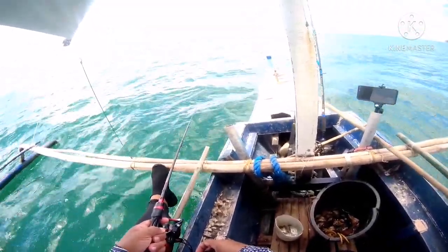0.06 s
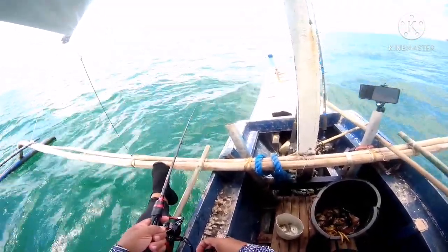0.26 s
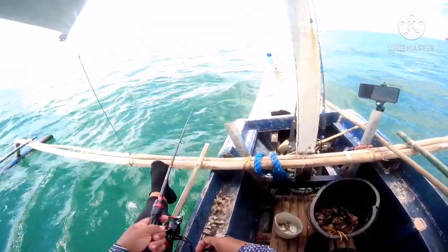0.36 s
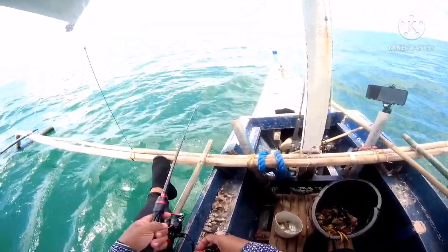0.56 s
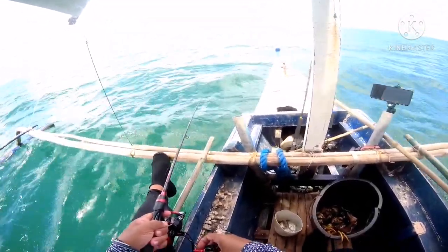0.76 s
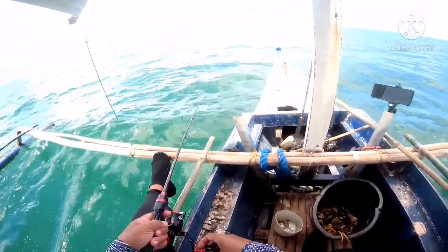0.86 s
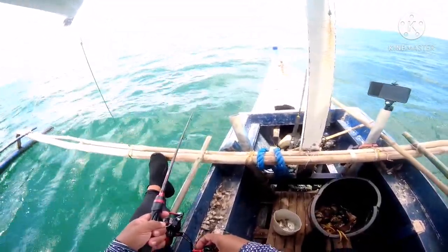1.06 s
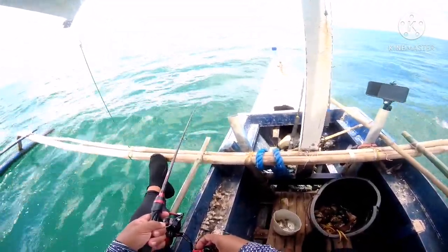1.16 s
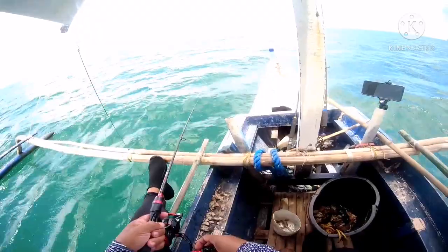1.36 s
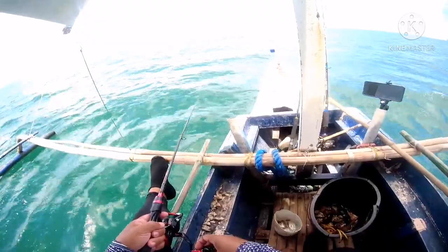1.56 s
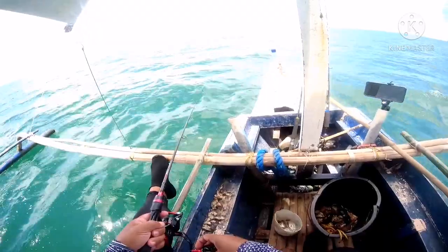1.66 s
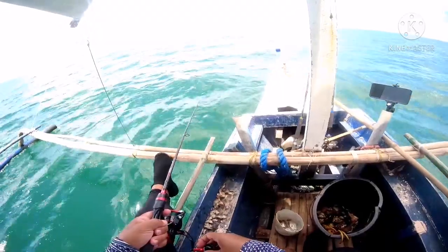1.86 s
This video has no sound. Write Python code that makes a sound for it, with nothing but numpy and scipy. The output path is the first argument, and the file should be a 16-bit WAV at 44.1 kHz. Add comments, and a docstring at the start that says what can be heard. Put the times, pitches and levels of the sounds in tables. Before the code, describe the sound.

Sea water sloshes against a small wooden boat, heard close from on board: hollow gulps and a slap early, sharp drips, then a heavier double slosh near the middle, fading to sparse trickles and drips.

```python
"""Water sloshes and gurgles under the hull of a small outrigger boat on a choppy sea, heard from on board.
Trapped pockets of air gulp as swelling tones, wavelets ring the hollow beside the hull, and heavy waves thud.
Two waves slap the side: short bursts of bubbles of many sizes. Spray patters and fizzes as crowds of bubbles.
Single drops tick close by, mostly on the right, each with a crack, a tiny ring and a splatter."""
import sys
import numpy as np
from scipy import signal
from scipy.fft import rfft, irfft
from scipy.io import wavfile

SR = 44100
rng = np.random.default_rng(int(sys.argv[2]) if len(sys.argv) > 2 else 0)


def store_wav(level_fs):
    """Save 16-bit WAV to argv[1]."""
    pcm = np.round(np.clip(np.atleast_2d(level_fs), -1, 1) * 32767)
    wavfile.write(sys.argv[1], SR, pcm.T.astype(np.int16))


N = 83790
T = np.arange(N) / SR   # time from the start, in seconds

# Levels in these tables are relative; some sounds get an overall gain in their own function.
# How much the side signal falls below the middle: f/Hz, level/dB
SIDE_LEVEL = [(100, -21.5), (600, -29), (1000, -18.5), (1500, -15), (2200, -9.5), (3200, -5.5),
              (5000, -4.5), (9000, -1)]
BOAT_DB, BOAT_T60_S = -10.5, 0.13   # reflections: level, time to fall 60 dB

# Heavy waves shove the air at the microphone: t/s, level/dB, decay time/s
SURGES = [(0.317, -26.5, 0.04), (0.831, -27, 0.02), (0.949, -15.5, 0.069)]
SURGE_RISE_S = 0.0012

# How hard the water works in each size of bubble, largest first: t/s, level/dB
HEAVE_LEVEL = [(0, -42), (.11, -57), (.15, -34.5), (.23, -51), (.29, -36), (.36, -49), (.405, -30),
               (.47, -54), (.51, -35.5), (.57, -52), (.66, -42), (.77, -40), (.835, -30), (.89, -40),
               (.945, -29.5), (1.04, -66), (1.45, -79), (1.5, -48.5), (1.54, -68), (1.9, -62.5)]   # deepest slosh under the hull
SLOSH_LEVEL = [(0, -33.5), (.115, -43.5), (.14, -32.5), (.2, -36), (.27, -18.5), (.35, -29.5), (.41, -22),
               (.48, -37.5), (.52, -30), (.57, -41), (.64, -30.5), (.76, -39), (.84, -16), (.89, -32.5),
               (.94, -25.5), (.995, -28), (1.04, -64), (1.27, -53.5), (1.37, -34), (1.46, -45),
               (1.58, -46.5), (1.88, -42)]
GURGLE_LEVEL = [(0, -40), (.17, -46), (.25, -51), (.28, -23), (.32, -33.5), (.40, -33), (.48, -46.5),
                (.79, -43.5), (.89, -35.5), (.94, -20), (1.02, -29.5), (1.11, -41.5), (1.21, -46),
                (1.27, -42.5), (1.42, -37.5), (1.52, -48), (1.6, -40), (1.71, -49.5), (1.9, -48.5)]
PATTER_LEVEL = [(0, -52.5), (.045, -41.5), (.125, -58), (.2, -44.5), (.3, -33), (.335, -38.5), (.45, -49),
                (.51, -36), (.56, -44), (.67, -34.5), (.71, -43), (.74, -34), (.8, -46), (.83, -36.5),
                (.9, -41.5), (.97, -29), (1.06, -33), (1.2, -35), (1.26, -48), (1.52, -51.5), (1.71, -55.5),
                (1.9, -44)]
FIZZ_LEVEL = [(0, -48), (.12, -51.5), (.25, -45), (.29, -41.5), (.34, -46), (.47, -48.5), (.52, -38),
              (.56, -45.5), (.6, -38.5), (.7, -43.5), (.75, -40.5), (.8, -43.5), (.87, -42), (.93, -37),
              (.99, -33.5), (1.06, -37), (1.16, -42.5), (1.23, -47.5), (1.33, -54), (1.45, -48.5),
              (1.7, -50), (1.9, -47.5)]
# Tone colour of each size: f/Hz, level/dB per bubble pitch
HEAVE_COLOUR = [(55, -16), (95, -17.5), (150, 3)]
SLOSH_COLOUR = [(185, -1), (230, 0), (290, -3), (360, -1), (450, -11.5)]
GURGLE_COLOUR = [(610, 1), (680, -0.97), (900, -5.1), (1450, 0.27)]
PATTER_COLOUR = [(1450, 1.2), (2000, 2.7), (3000, -0.5), (4800, -2)]
FIZZ_COLOUR = [(4800, 3), (7000, -0.5), (10000, -0.5), (13000, -4.5), (15500, -4)]
BUBBLE_ONSET_CYCLES = 3.47   # length of the push that sets a bubble ringing
SPRAY_PER_S = 1100   # falling spray is a dense crowd of small bubbles

# Wavelets lap into the hollow: t/s, pitch f/Hz, peak level/dB, swell time/s, loss one octave from pitch/dB
LAPS = [(.182, 600, -21, 0.031, 4), (1.015, 970, -24, 0.013, 44), (1.187, 1210, -32, 0.013, 7),
        (1.275, 1400, -38.5, 0.0081, 22), (1.304, 365, -36.5, 0.018, 17), (1.377, 510, -24.5, 0.0048, 8.5),
        (1.419, 520, -25.5, 0.0052, 5), (1.579, 1040, -30.5, 0.011, 30), (1.622, 1070, -30, 0.0075, 45)]
# Resonances of the hollow between hull and water: f/Hz, level/dB
HOLLOW = [(345, -0.5), (668, -0.5), (880, -2.5), (1210, -7), (1400, -12), (1700, -5)]
HOLLOW_WIDTH_HZ = 68   # bandwidth of each resonator; the sound passes through it twice

# Drops land near by: t/s, pitch f/Hz, level/dB, left minus right level/dB, cycles to the peak of the ring
DROPS = [(0.025, 5200, -32, -4, 3.8), (0.152, 3430, -17, 0.5, 1.6), (0.583, 8470, -19, -7, 1.2),
         (0.6078, 7400, -17, -10, 0.38), (0.644, 6360, -23.5, -4, 4.1), (0.665, 4760, -21, -17, 0.45),
         (.679, 11300, -16, -8, 0.42), (.7279, 4550, -6, -4, 0.86), (0.8569, 7000, -13.5, -9.5, 1.03),
         (1.1502, 8840, -11, -9, 0.5), (1.1805, 4170, -21, -1, 1), (1.3914, 7850, -14.5, -6, 0.46),
         (1.428, 8100, -26.5, 4, 0.79), (1.5508, 8760, -20.5, -8, 2), (1.731, 3700, -25.5, -3, 1.6)]
DROP_CRACK, DROP_CRACK_S = 0.41, 0.00044   # strength relative to the ring, decay time
SPLATTER_DB, SPLATTER_S = -20, 0.012   # level relative to the ring, decay time
DROP_LAG_S = .00002   # a drop reaches the left side later

# Waves slap the hull: t/s, level/dB, decay time/s
SLAPS = [(0.2652, -15.5, 0.013), (0.9658, -15, 0.019)]
# Tone colour of a slap: f/Hz, level/dB per bubble pitch
SLAP_COLOUR = [(150, -17), (330, 8), (650, 12.5), (1300, 4.5), (2500, 10), (4500, 0.5), (10000, -1),
               (15500, -6)]
SLAP_ATTACK_S = 0.001

# Large air pockets close by: t/s, pitch f/Hz, level/dB, ring length/cycles
GULPS = [(0.133, 251, -23.5, 3.4), (1.872, 249, -33, 7.4), (0.2394, 910, -11.5, 6.6), (.267, 339, -16, 6.9),
         (0.313, 155, -14.5, 1.3), (0.38, 178, -18, 1.5), (.390, 348, -21.5, 9.1), (0.404, 200, -21, 4.9),
         (0.5, 157, -29, 1.2), (0.631, 1090, -31.5, 15.7), (0.732, 1050, -33, 30), (.782, 444, -23, 26),
         (0.8267, 189, -5.5, 1.75), (.828, 530, -21.5, 4.9), (.842, 266, -13.5, 3.3), (0.94, 448, -4, 3.1),
         (0.942, 151, -18, 2.3), (1.154, 1350, -27.5, 28), (1.177, 951, -24.5, 8.1), (1.286, 1430, -33, 22),
         (1.316, 1180, -31.5, 18), (1.385, 1736, -36.5, 38), (1.858, 2700, -37, 14), (1.49, 260, -28, 5.3),
         (1.574, 1060, -24.5, 13.4), (.472, 1810, -26, 18), (.668, 2010, -25.5, 14),
         (1.129, 1760, -26.5, 9), (1.821, 1532, -25.5, 11.5), (1.881, 1397, -29.5, 34)]
GULP_SWELL, GULP_RISE = 0.24, 0.015   # share of a ring length spent swelling, pitch rise per ring length
GULP_DB = -2.5   # overall level
# Smaller bubbles shed by a pocket: level, swell time relative to the pocket's own, ring length
CHURN_DB, CHURN_LASTS, CHURN_CYCLES = -22, 4.55, 14.6

CUTOFF_HZ = 16000


def from_db(db):
    """Turn decibels into a plain multiplier."""
    return 10 ** (np.asarray(db) / 20)


def rms_one(x):
    """Scale a sound to an average strength (rms) of 1."""
    return x / np.sqrt(np.mean(x ** 2) + 1e-20)


def level(rows):
    """Gain over time, drawn as straight lines in dB between the rows."""
    times, dbs = np.transpose(rows)
    return from_db(np.interp(T, times, dbs))


def at_hz(points, hz):
    """Gain at a frequency, read between the points on a musical (log) scale."""
    pitches, dbs = np.transpose(points)
    return from_db(np.interp(np.log(hz), np.log(pitches), dbs))


def panned(db):
    """Left and right gains for a left minus right level difference."""
    return from_db(np.array([[.5], [-.5]]) * db)


def add(out, s, sound):
    """Mix a sound in from time s."""
    start = int(s * SR)
    out[:, start:] += sound[..., :N - start]


def stereo(mid, side, wide_db=0):
    """Left and right share the middle; the side sets them apart, little in the bass and more in the treble."""
    n = len(side)
    hz = (np.arange(n // 2 + 1) + .5) * SR / n
    side = irfft(rfft(side) * at_hz(SIDE_LEVEL, hz), n) * from_db(wide_db)
    return np.array([mid + side, mid - side])


def ring(x, hz, cycles):
    """A resonance that falls 60 dB in so many cycles, scaled for equal energy at any pitch."""
    hz = min(hz, .45 * SR)
    decay = from_db(-60 * hz / (cycles * SR))   # shrinkage per sample
    turn = 2 * np.pi * hz / SR   # phase step per sample
    feed = np.sqrt(1 - decay * decay) * np.array([1, 0, -1])
    feedback = [1, -2 * decay * np.cos(turn), decay * decay]
    return signal.lfilter(feed, feedback, x + 1e-18)


def bubbles(colour, per_s, cycles, spread_db, wash, wide_db=0, count=24):
    """A stereo cloud of random bubbles that swell and ring out, over a wash of countless far ones; rms 1."""
    low, high = colour[0][0], colour[-1][0]
    out = np.zeros((2, N))   # middle and side
    for hz in np.geomspace(low, high, count):
        born = rng.random(N) < per_s / count / SR
        size_db = spread_db * (np.minimum(rng.exponential(1, N), 4) - 2)
        sizes = from_db(size_db) * rng.choice([-1, 1], N)
        far, far_side, place = rng.standard_normal((3, N))
        # rarer bubbles are made stronger, to balance them with the wash
        near = born * sizes * np.sqrt(count * SR / per_s)
        source = np.array([near + wash * far, near * place + wash * far_side])
        push = np.sqrt(hz) * ring(source, hz, BUBBLE_ONSET_CYCLES)
        out += at_hz(colour, hz) * ring(push, hz, cycles)
    edges = [low * .85, min(high * 1.15, .45 * SR)]
    band = signal.butter(2, edges, "band", fs=SR, output="sos")
    mid, side = signal.sosfilt(band, out)
    return rms_one(stereo(mid, side, wide_db))


def boat(x):
    """A brief scatter of reflections from hull and deck: fading noise that smears the sound."""
    t = T[:SR // 4]
    mid, side = rng.standard_normal((2, len(t))) * from_db(-60 * t / BOAT_T60_S)
    echoes = stereo(mid, side) / np.sqrt(np.sum(mid ** 2))
    return from_db(BOAT_DB) * signal.fftconvolve(x, echoes, axes=1)[:, :N]


def surges():
    """A quick rise of air pressure that leaks away: a soft thud."""
    out = 0
    for s, db, decay_s in SURGES:
        t = np.maximum(T - s, 0)
        rise = 1 - np.exp(-(t / SURGE_RISE_S) ** 2)
        out = out + from_db(db) * rise * np.exp(-t / decay_s)
    return out


def water():
    """Five sizes of bubble, from the low heave under the hull to the high fizz of foam."""
    heave = bubbles(HEAVE_COLOUR, per_s=130, cycles=5.4, spread_db=3.5, wash=0.17, count=8)
    slosh = bubbles(SLOSH_COLOUR, per_s=400, cycles=12.2, spread_db=0.0, wash=0.36, count=14)
    gurgle = bubbles(GURGLE_COLOUR, per_s=900, cycles=14.6, spread_db=0.5, wash=0.89)
    patter = bubbles(PATTER_COLOUR, SPRAY_PER_S, cycles=58, spread_db=3.5, wash=0.43, count=36)
    fizz = bubbles(FIZZ_COLOUR, SPRAY_PER_S, cycles=21, spread_db=2.5, wash=0.7)
    out = from_db(4.5) * level(HEAVE_LEVEL) * heave
    out += from_db(-7.5) * level(SLOSH_LEVEL) * slosh
    out += from_db(-9.0) * level(GURGLE_LEVEL) * gurgle
    out += from_db(-3.0) * level(PATTER_LEVEL) * patter * panned(db=-0.5)
    out += from_db(-1) * level(FIZZ_LEVEL) * fizz * panned(db=-3.5)
    return out


def laps():
    """A wavelet churns in the hollow beside the hull and rings the resonances nearest its own pitch."""
    out = np.zeros((2, N))
    for s, pitch_hz, db, swell_s, focus_db in LAPS:
        churn = rng.standard_normal((2, N)) * T * np.exp(-T / swell_s)
        glug = 0
        for hz, mode_db in HOLLOW:
            cycles = np.log(1000) / np.pi * hz / HOLLOW_WIDTH_HZ   # bandwidth turned into ring length
            mid, side = ring(ring(churn, hz, cycles), hz, cycles)
            octaves_off = np.log2(hz / pitch_hz)
            gain = from_db(mode_db - focus_db * octaves_off ** 2)
            glug = glug + gain * rms_one(stereo(mid, side))
        add(out, s, from_db(db) * glug / np.abs(glug).max())
    return out


def drops():
    """A drop lands with a crack, briefly rings a tiny bubble and throws up a short splatter."""
    out = np.zeros((2, N))
    for s, hz, db, pan_db, cycles in DROPS:
        noise = rng.standard_normal((3, N))
        swell = T * hz / cycles   # reaches 1 at the peak of the ring
        tone = swell * np.exp(1 - swell) * np.sin(2 * np.pi * hz * T)
        crack = DROP_CRACK * rms_one(ring(noise[2], hz, cycles=1.5)) * np.exp(-T / DROP_CRACK_S)
        tick = tone + crack
        late_tick = np.interp(T - DROP_LAG_S, T, tick, left=0)
        mid, side = ring(noise[:2], hz, cycles=8)
        splatter = from_db(SPLATTER_DB) * rms_one(stereo(mid, side)) * np.exp(-T / SPLATTER_S)
        both = np.array([late_tick, tick])
        add(out, s, from_db(db - 3) * (both + splatter) * panned(db=pan_db))
    return out


def slaps():
    """Each slap bursts into bubbles of many sizes at once, then dies away."""
    envelope = 0
    for s, db, decay_s in SLAPS:
        t = np.maximum(T - s, 0)
        attack = 1 - np.exp(-t / SLAP_ATTACK_S)
        envelope = envelope + from_db(db) * attack * np.exp(-t / decay_s)
    burst = bubbles(SLAP_COLOUR, per_s=9900, cycles=14, spread_db=2.5, wash=0.95, wide_db=4.5, count=36)
    return from_db(2.5) * envelope * burst * panned(db=-2.5)


def gulps():
    """An air pocket swells, rings, rises a little in pitch and sheds a churn of smaller bubbles."""
    out = np.zeros((2, N))
    for s, hz, db, cycles in GULPS:
        age = T * hz / cycles   # in ring lengths
        swell = age / GULP_SWELL   # reaches 1 when the tone is loudest
        pitch_hz = hz * (1 + GULP_RISE * (np.minimum(age, 2) - GULP_SWELL))
        phase = 2 * np.pi * np.cumsum(pitch_hz) / SR
        tone = swell * np.exp(1 - swell) * np.sin(phase)
        shed = ring(ring(rng.standard_normal(N), hz, CHURN_CYCLES), hz, CHURN_CYCLES)
        slow_swell = swell / CHURN_LASTS
        churn = from_db(CHURN_DB) * rms_one(shed) * slow_swell * np.exp(1 - slow_swell)
        add(out, s, from_db(db + GULP_DB) * (tone + churn) * panned(db=-1.9))
    return out


def scene():
    """Moving water with its surges, slaps, laps, gulps and drops; the drops are drier than the pockets."""
    pockets = gulps() + laps()
    ticks = drops()
    reflections = boat(pockets + .5 * ticks)
    return surges() + water() + slaps() + pockets + ticks + reflections


def record(dry):
    """A steep low-pass filter cuts the top of the treble."""
    low_pass = signal.ellip(10, .3, 80, CUTOFF_HZ, fs=SR, output="sos")
    return signal.sosfilt(low_pass, dry)


dry = scene()
out = record(dry)
store_wav(out)
```